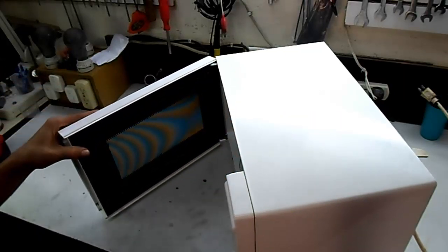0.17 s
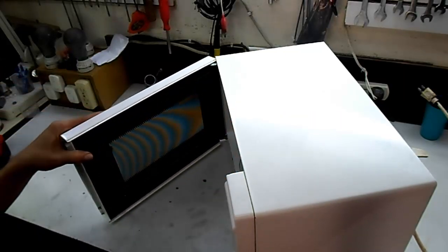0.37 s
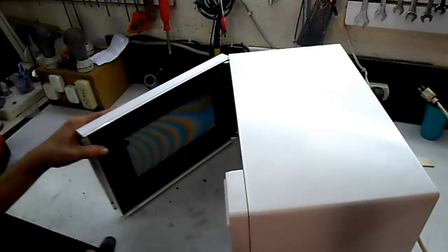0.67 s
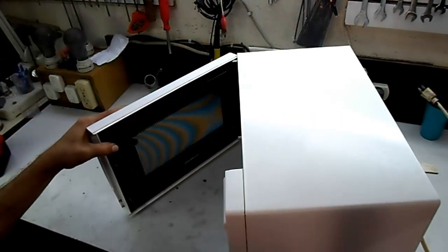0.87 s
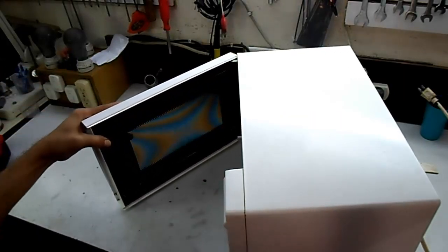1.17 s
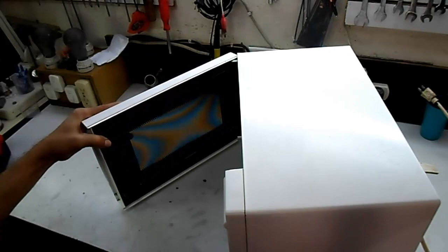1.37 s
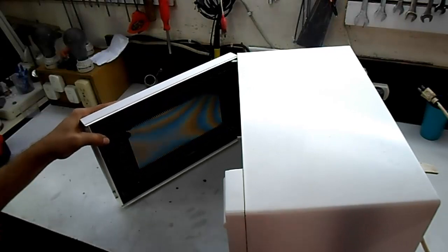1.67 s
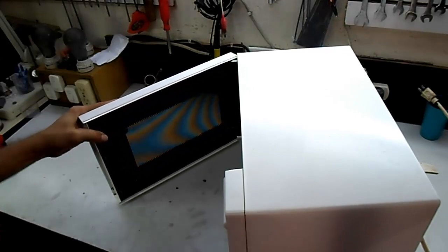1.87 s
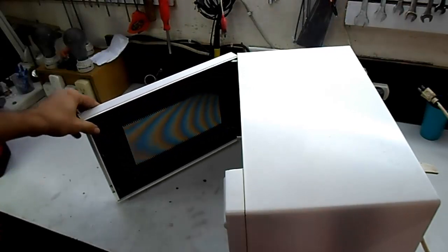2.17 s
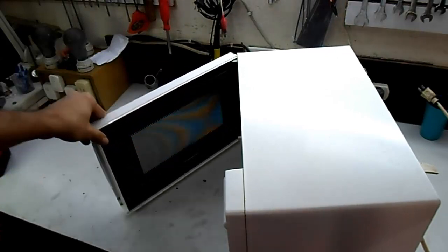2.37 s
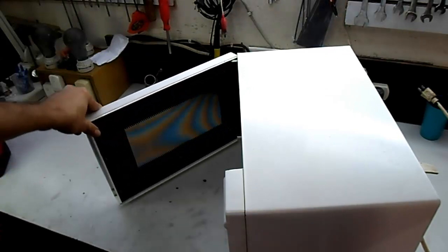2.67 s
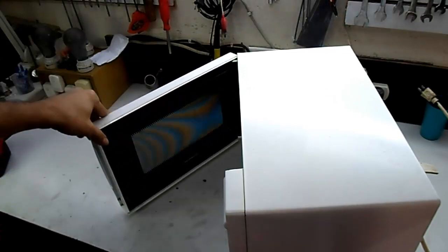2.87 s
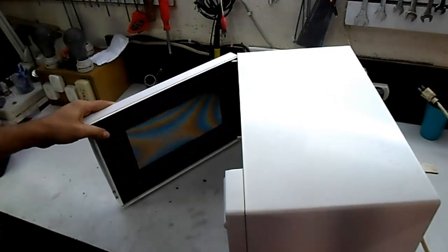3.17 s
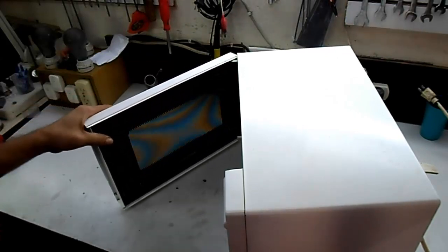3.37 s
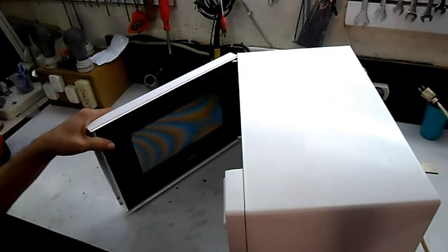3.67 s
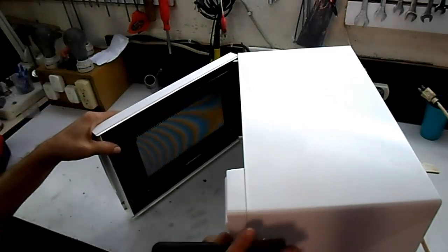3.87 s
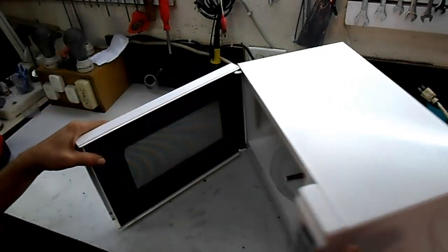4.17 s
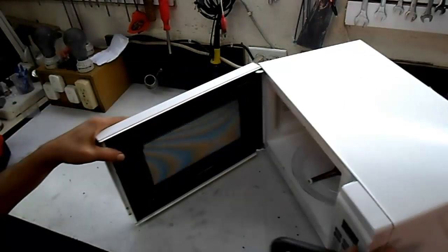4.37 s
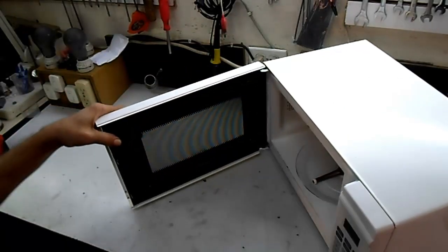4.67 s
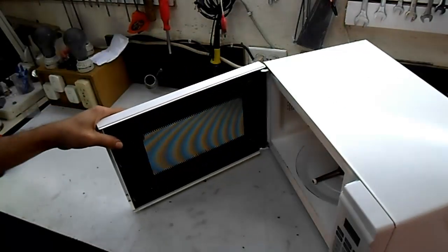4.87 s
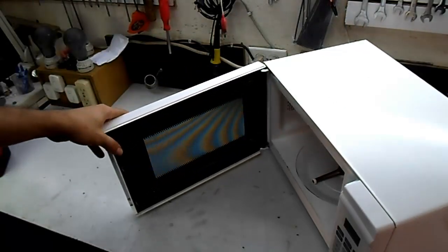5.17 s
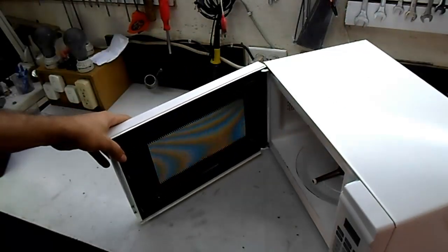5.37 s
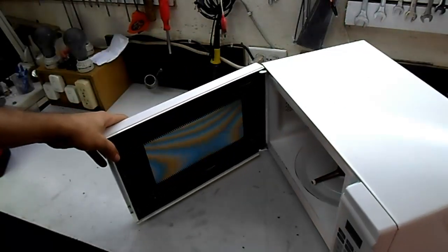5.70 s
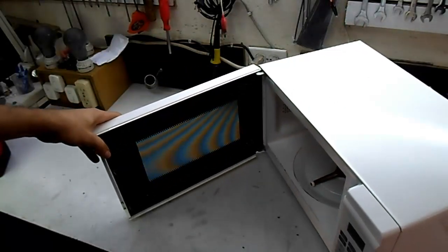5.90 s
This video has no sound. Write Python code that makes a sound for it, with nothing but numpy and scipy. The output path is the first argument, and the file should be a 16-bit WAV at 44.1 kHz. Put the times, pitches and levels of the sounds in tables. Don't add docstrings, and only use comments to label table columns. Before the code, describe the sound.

A hand works the loose door of a small metal oven on a workbench. It starts mid-rattle with hollow bangs and dragging, eases into creaks and ticks, then clunks hard twice more. Feet scrape and the case lands with low booming knocks near the end. Close, mono, rough small camera microphone, with faint workshop hum.

```python
import sys
import numpy as np
from scipy import signal
from scipy.fft import rfft, irfft, next_fast_len
from scipy.io import wavfile
from scipy.ndimage import uniform_filter1d

SR = 44100
rng = np.random.default_rng(int(sys.argv[2]) if len(sys.argv) > 2 else 0)


def log_audio(samples):
    frames = np.atleast_2d(samples).T
    limited = np.clip(frames, -1, 1)
    pcm = np.round(limited * 32767).astype(np.int16)
    wavfile.write(sys.argv[1], SR, pcm)


def decibels_to_gain(level_db):
    exponent = np.asarray(level_db, float) / 20
    return 10 ** exponent


N = 266187

# pitch_hz, level_db, t60_s
CASE_MODES = [(144.8, -8, .3), (161, -5.5, 0.8), (197, 0, 0.24), (212.7, -9, 0.59), (223.6, -1.5, 0.15)]
PANEL_MODES = [(243, -7, 0.067), (271.9, -9, 0.17), (287, -3.5, 0.17), (324, 0, 0.089), (347.6, -9, 0.2),
               (367.2, -1.5, 0.31), (406.4, -22.5, 0.45), (464.4, -8, 0.14), (490, -14, 0.3),
               (524, -3, 0.16), (558, -11, 0.2), (622, -3, 0.091), (644, -12, 0.2), (705, -9, 0.16),
               (800, -20, 0.17), (855, -14, 0.24)]
# pitch_hz, level_db, t60_s
PART_MODES = [(995, -2.5, 0.24), (1137, -7.5, 0.15), (1360, -1.5, 0.027), (1500, -8.5, 0.15),
              (1614, -8.5, 0.14), (1833, -5, 0.053), (2173, -6.5, 0.054), (2686, -19.5, 0.11)]
BENCH_MODES = [(52, -16, 0.14), (63.2, -8, 0.12), (79.2, 0, 0.24), (105, -11, 0.17), (120, -4.5, 0.22)]
# pitch_hz, level_db, t60_s
LATCH_MODES = [(851, -0.5, .12), (1450, -6.5, 0.075), (2250, -6, 0.1), (3510, -15, 0.03),
               (4750, -21, 0.093), (5400, -17, .08)]

# freq_hz, level_db (per Hz)
RATTLE_SPECTRUM = [(150, -24), (400, -1), (700, -0.5), (1300, -5), (1900, -7), (2600, -13), (4000, -25),
                   (8000, -35.5)]
GRIT_SPECTRUM = [(800, -29), (2000, 1), (3200, 1.5), (5000, -4), (7000, -5.5), (10000, -29.5)]
RUSTLE_SPECTRUM = [(300, -22), (1500, -1), (3000, 0.5), (5000, 0), (9000, 0)]
SHOP_SPECTRUM = [(10, -113), (22, -42), (45, -61.5), (62, -57.5), (120, -76), (250, -71.5), (500, -72.5),
                 (1000, -77.5), (2000, -84), (4000, -91), (8000, -97.5)]
MICROPHONE = [(4000, -1), (6500, 0.5), (8700, 7), (9500, 5), (10200, 0), (10600, -6.5), (10900, -14),
              (11020, -8)]

# start_s, blow_db, favoured_hz, narrowness_db_per_octave, judder_t60_s
DOOR_BLOWS = [(.013, -7, 362, 16, .097), (.315, -2, 314, 25, .087), (.646, -28, 285, 20, .083),
              (1.233, -6, 340, 26, .094), (1.854, -13, 288, 90, .11), (1.882, -9, 273, 56, .037),
              (2.284, -13, 286, 4, .074), (2.305, -7.5, 276, 21, .2), (2.332, -9, 282, 9, .17),
              (2.356, -4, 330, 28, .057), (2.632, -26, 326, 40, .09), (3.1678, 1, 281, 28, .092),
              (3.188, -1.5, 287, 21, .086), (3.222, -2.5, 334, 25, .11), (3.244, -10, 253, 43, .067),
              (4.712, -13, 370, 52, .072), (5.324, -15, 370, 48, .15)]
# start_s, blow_db, favoured_hz, narrowness_db_per_octave, judder_t60_s
CASE_BLOWS = [(.299, -9.5, 190, 27, .13), (.428, -17.5, 190, 18, .06), (.457, -13, 214, 18, .15),
              (.715, -18.5, 218, 40, .079), (.916, -9, 232, 12, .07), (.942, -8, 205, 42, .089),
              (1.276, -12.5, 220, 33, .26), (2.376, -9.5, 227, 22, .066), (3.527, -23, 226, 18, .11),
              (4.125, -17, 180, 17, .16), (4.69, -9, 198, 68, .091), (4.802, -3, 205, 34, .17),
              (4.846, -10.5, 198, 34, .08), (5.3, -5.5, 200, 50, .082), (5.314, 0, 197, 70, .19)]
# peak_s, rise_s (per 20 dB), fall_s (per 20 dB), case_db, panel_db
PUSHES = [(0., .05, .17, -13, -14), (.212, .2, .06, -22, -15), (.329, .05, .2, -12, -9),
          (.47, .08, .15, -30, -22), (.655, .025, .2, -32, -22), (.755, .15, .08, -23, -38),
          (.945, .04, .14, -32, -15), (1.236, .01, .28, -24, -19), (3.05, .12, .1, -55, -35),
          (1.876, .05, .08, -36, -23), (2.365, .09, .1, -19, -16), (2.654, .06, .05, -37, -28),
          (3.19, .03, .03, -22, -12), (3.222, .08, .14, -16, -15), (3.546, .08, .07, -30, -22.5),
          (4.06, .09, .05, -28, -45), (4.15, .02, .1, -20, -21), (4.29, .3, .18, -28, -23),
          (4.715, .08, .08, -22, -17), (4.59, .07, .08, -22, -26), (4.74, .1, .4, -15, -30),
          (4.85, .08, .12, -23, -14), (5.28, .1, .05, -25, -21), (5.35, .08, .07, -15, -12),
          (5.69, .1, .2, -32, -32)]
# peak_s, rise_s (per 20 dB), fall_s (per 20 dB), rattle_db, grit_db
SLIDES = [(.01, .1, .6, -24.5, -45), (.12, .12, .5, -28, -31.5), (.215, .3, .12, -23.5, -40),
          (.325, .02, .14, -21.5, -37), (.65, .02, .12, -33, -52), (.96, .08, .2, -34, -34),
          (1.06, .3, .3, -32, -46), (1.236, .01, .16, -29.5, -46), (1.507, .4, .06, -42.5, -48),
          (1.77, .2, .1, -46, -42), (1.87, .06, .13, -30, -40), (2.36, .17, .22, -28, -36),
          (2.722, .01, .14, -44, -42), (2.87, .015, .06, -50, -35.5), (3.168, .001, .2, -23, -42),
          (3.23, .05, .1, -27, -50), (3.07, .25, .3, -43, -52), (3.68, .06, .22, -34, -36),
          (3.55, .06, .15, -38, -46), (4.128, .003, .2, -26, -46), (4.28, .05, .25, -33, -48),
          (4.44, .5, .9, -31.5, -31), (4.84, .09, .12, -26, -30), (5.33, .12, .16, -31.5, -41),
          (6.03, .3, .1, -42, -48)]
# peak_s, level_db, pitch_hz, length_s
BOUNCES = [(0.0027, -10.1, 360, 0.0107), (0.0159, -8.7, 352, 0.0188), (0.0439, -8.2, 304, 0.0119),
           (0.0573, -14.5, 258, 0.0125), (0.0733, -14.8, 312, 0.0118), (0.0861, -12.3, 320, 0.0084),
           (0.1051, -15.8, 263, 0.0224), (0.1779, -15.5, 239, 0.0085), (0.1975, -14.3, 314, 0.0233),
           (0.2372, -13.8, 322, 0.0086), (0.3211, -2.0, 328, 0.0126), (0.3355, -1.4, 314, 0.0216),
           (0.3733, -6.3, 328, 0.0185), (0.4042, -10.0, 215, 0.0231), (0.4274, -14.0, 325, 0.0153),
           (0.4611, -13.3, 209, 0.0112), (0.9204, -9.0, 218, 0.019), (0.9452, -9.4, 220, 0.0174),
           (0.9671, -12.9, 218, 0.0166), (1.2441, -10.2, 339, 0.0169), (1.26, -14.2, 322, 0.0148),
           (1.2855, -13.6, 209, 0.0172), (1.8625, -14.6, 266, 0.0202), (1.8873, -11.3, 261, 0.0116),
           (2.2884, -13.9, 309, 0.0135), (2.312, -8.0, 282, 0.0083), (2.3449, -8.9, 306, 0.0313),
           (2.3642, -4.0, 352, 0.0165), (2.3787, -4.6, 277, 0.0118), (2.3992, -13.2, 199, 0.0168),
           (2.4151, -15.9, 193, 0.0275), (3.1717, -2.7, 296, 0.0089), (3.1952, 0.2, 271, 0.01),
           (3.2122, -6.0, 236, 0.0151), (3.2298, -4.2, 336, 0.0211), (3.2474, -5.5, 234, 0.0199),
           (3.2685, -14.2, 320, 0.0117), (3.2806, -12.0, 207, 0.0157), (3.3054, -16.7, 201, 0.0189),
           (4.1334, -18.5, 196, 0.0254), (4.7171, -8.9, 207, 0.0356), (4.7562, -15.6, 218, 0.0185),
           (4.7824, -13.7, 212, 0.0189), (4.8213, -5.3, 218, 0.0246), (4.8447, -9.7, 226, 0.0117),
           (4.8663, -11.6, 220, 0.0175), (5.3055, -9.5, 201, 0.0159), (5.3251, -5.8, 204, 0.0201),
           (5.3426, -7.3, 207, 0.023), (5.3646, -9.1, 201, 0.0372),
           (.468, -19, 315, .02),
    (.653, -21, 310, .013),
    (.723, -21, 213, .019),
    (1.328, -19, 240, .017),
    (1.388, -20, 229, .023),
    (4.18, -20, 215, .022),
    (4.698, -14, 205, .02),
    (4.806, -7, 205, .014),
    (4.92, -21, 205, .024),
]
# pitch_multiple, level_db
BOUNCE_TONES = [(1, -1.5), (.62, -19), (.82, -14), (1.19, -13), (1.65, -19), (2.1, -21)]
# peak_s, fall_s (per 20 dB), level_db
THUDS = [(.01, .2, -18), (.31, .4, -15), (.49, .15, -16), (.97, .1, -33), (1.36, .6, -29.5),
         (2.32, .22, -14), (2.86, .1, -28), (3.2, .45, -15), (4.14, .1, -18), (4.29, .15, -24),
         (4.58, .2, -25), (4.8, .1, -17), (4.97, .12, -16), (5.31, .3, -23), (5.67, .15, -25)]
# peak_s, level_db, pitch_hz, length_s
TAPS = [(0.014, -21.2, 1065, 0.0112), (0.0937, -23.3, 1429, 0.012), (0.1345, -23.9, 1197, 0.015),
        (0.1676, -24.0, 1399, 0.015), (0.1807, -23.3, 998, 0.015), (0.2068, -22.2, 1843, 0.015),
        (0.2377, -23.0, 1711, 0.0121), (0.3236, -17.5, 904, 0.0143), (0.3487, -18.3, 934, 0.015),
        (0.4305, -25.5, 855, 0.0112), (2.2865, -28.8, 1313, 0.0073), (2.3079, -28.4, 1324, 0.015),
        (2.3346, -27.3, 1041, 0.0046), (2.3472, -22.1, 904, 0.0071), (2.3586, -25.2, 1652, 0.015),
        (2.3796, -24.3, 925, 0.0098), (3.1699, -21.1, 866, 0.0076), (3.1937, -22.6, 1006, 0.015),
        (3.2297, -22.6, 947, 0.015), (4.1339, -14.8, 1480, 0.004), (4.1525, -19.3, 872, 0.015),
        (4.1657, -18.8, 1044, 0.0098), (4.181, -21.8, 882, 0.015), (4.1976, -26.0, 890, 0.0119),
        (4.452, -17.9, 1211, 0.0076), (4.4683, -22.0, 1235, 0.0055), (4.4817, -24.7, 1187, 0.015),
        (4.785, -28.0, 899, 0.0105), (4.797, -27.4, 1329, 0.0098), (4.8291, -23.3, 1294, 0.015),
        (4.8425, -25.1, 1491, 0.015), (4.8579, -27.0, 942, 0.0125), (4.8779, -25.6, 1733, 0.0115)]
# pitch_multiple, level_db
TAP_TONES = [(1, -6.5), (.6, -13), (.74, -12), (.87, -11), (1.13, -11), (1.29, -13), (1.46, -15),
             (1.68, -17), (1.93, -19), (2.4, -23), (3.1, -27)]
# peak_s, rise_s (per 20 dB), fall_s (per 20 dB), level_db
RUSTLES = [(.056, .17, .8, -38.5), (.25, .6, .05, -41), (.38, .15, .1, -43), (.6, .45, .3, -38.5),
           (.95, .17, .22, -39), (1.19, .4, .3, -49), (1.39, .6, .8, -47), (1.615, .3, .18, -41),
           (1.82, .5, .1, -46), (1.876, .1, .23, -42.5), (2.37, .5, .18, -43), (2.722, .02, .08, -53),
           (3.05, .1, .04, -51), (3.222, .07, .13, -42), (3.65, .6, .7, -49), (4.07, .35, .12, -43),
           (4.36, .5, .9, -39), (4.78, .3, .22, -40), (4.89, .5, .07, -43), (5.079, .03, .25, -48),
           (5.21, .3, .2, -51), (5.345, .05, .45, -48), (5.8, .004, .1, -42), (5.96, .03, .4, -50)]
# start_s, snap_db, knock_db, tail_t60_s
TICKS = [(0.3145, -34, -18, 0.12), (0.4284, -46.5, -36, 0.13), (0.635, -50, -28, 0.2),
         (0.7924, -36.5, -26.5, 0.17), (1.1428, -19, -24.5, 0.17), (2.05, -29, -38, 0.22),
         (2.153, -30.5, -51, 0.15), (2.263, -28, -32, 0.12), (2.7182, -35, -25.5, 0.38),
         (2.865, -35, -27, 0.25), (3.3376, -38, -30, 0.24), (3.6263, -31, -50, 0.12),
         (3.6534, -43, -33, 0.2), (3.6691, -23, -29, 0.13), (3.7477, -36, -29, 0.13),
         (3.9227, -32, -40, 0.15), (4.004, -46, -34.5, 0.19), (4.1272, -38, -20.5, 0.18),
         (4.445, -48, -33, 0.14), (4.781, -32, -27, 0.25), (4.9767, -46, -33, 0.084),
         (5.0783, -24.5, -34, 0.15), (5.1911, -38, -31, 0.16), (5.3353, -23, -39, 0.23),
         (5.7958, -28, -38, 0.12), (5.8272, -30, -45, 0.15), (5.8142, -31, -39, 0.2),
         (5.9437, -35, -50, 0.19)]
# start_s, t60_s, pitch_hz,
# width_hz, level_db
SQUEAKS = [
    (1.04, .3, 2250, 150, -35),
    (1.455, .35, 2350, 200, -41),
    (2.99, .12, 7200, 40, -49),
    (2.99, .13, 7800, 40, -47),
    (3.02, .12, 10400, 80, -50),
    (3.25, .52, 161, 14, -20.5),
    (3.655, .13, 2250, 150, -44),
    (3.745, .11, 2250, 80, -38),
    (4.23, 2.5, 5300, 350, -50),
]
# start_s, t60_s, pitch_hz, width_hz, level_db
RINGS = [
    (1.143, .26, 4740, 220, -43),
    (1.146, .14, 800, 120, -40),
    (2.72, .13, 4700, 250, -50),
    (2.72, .15, 1400, 120, -43),
    (4.128, .29, 1180, 250, -35),
    (4.128, .2, 1500, 300, -29),
    (4.128, .25, 2200, 400, -36),
    (4.128, .3, 813, 120, -36),
    (4.445, .25, 1290, 200, -36),
    (4.44, .27, 1660, 230, -35),
]
# peak_s, level_db, pitch_hz, length_s
PINGS = [
    (1.146, -29, 4780, .005),
    (1.146, -30, 9800, .003),
    (5.798, -37, 9200, .0035),
    (5.8155, -38, 9100, .0035),
    (5.829, -40, 8900, .003),
    (5.945, -39, 9100, .0035),
]


def unit(x):
    return x / np.sqrt(np.mean(x ** 2))


def colour(x, points):
    hz, db = np.transpose(points)
    size = next_fast_len(len(x))
    f = np.maximum(np.arange(size // 2 + 1) * SR / size, 1)
    gain = decibels_to_gain(np.interp(np.log(f), np.log(hz), db))
    return irfft(rfft(x, size) * gain, size)[:len(x)]


def ring(force, modes):
    out = 0
    for k, (hz, db, t60) in enumerate(modes):
        r = 1000. ** (-1 / (t60 * SR))
        w = 2 * np.pi * hz / SR
        mode = signal.lfilter([np.sin(w)], [1, -2 * r * np.cos(w), r * r], force)
        out = out + (-1) ** k * decibels_to_gain(db) * np.sqrt(1 - r * r) * mode
    return out


def walk(rate_hz):
    k = int(SR / rate_hz)
    steps = np.repeat(rng.standard_normal(N // k + 1), k)
    return 1.18 * uniform_filter1d(uniform_filter1d(steps, k), k)[:N]


def judder(rough_db):
    return unit(rng.standard_normal(N) * decibels_to_gain(rough_db * walk(90)))


def bursts(times, dbs, t60s, rise_s):
    out = np.zeros(N)
    for s, db, t60 in zip(times, dbs, t60s):
        i = int(s * SR)
        t = np.arange(min(N - i, int(1.2 * t60 * SR))) / SR
        out[i:i + len(t)] += decibels_to_gain(db - 60 * t / t60) * (1 - np.exp(-t / rise_s))
    return out


def swells(peak_s, rise_s, fall_s, peak_db, rest_db):
    late = np.arange(0, N + 64, 64)[:, None] / SR - peak_s
    each = peak_db - 20 * np.where(late < 0, -late / rise_s, late / fall_s)
    db = 10 * np.log10(np.sum(decibels_to_gain(2 * each), axis=1) + decibels_to_gain(2 * rest_db))
    return np.interp(np.arange(N) / 64, np.arange(len(db)), db)


def contacts(table, tones, sag):
    out = np.zeros(N)
    phases = rng.random((len(table), len(tones)))
    for (s, db, hz, length), phase in zip(table, phases):
        rise = length / 2.4
        i = int((s - rise) * SR)
        t = np.arange(int(9 * rise * SR)) / SR
        cycles = hz * t * (1 - sag * t / length)
        tone = sum(decibels_to_gain(g) * np.sin(2 * np.pi * (k * cycles + p)) for (k, g), p in zip(tones, phase))
        contact = decibels_to_gain(db) * t / rise * np.exp(1 - t / rise) * tone
        out[max(i, 0):i + len(t)] += contact[max(-i, 0):]
    return out


def shop():
    return np.sqrt(SR / 2) * colour(rng.standard_normal(N), SHOP_SPECTRUM) * decibels_to_gain(.6 * walk(3))


def shell(modes, drag_db, drag_hz):
    s, blow, favoured_hz, narrowness, t60 = np.transpose(DOOR_BLOWS + CASE_BLOWS)
    force, out = judder(0.76), 0
    for hz, db, ring_t60 in modes:
        reach = blow - np.minimum(narrowness * np.abs(np.log2(hz / favoured_hz)), 18.)
        drag = drag_db - np.minimum(35.0 * np.abs(np.log2(hz / drag_hz)), 14.)
        kick = bursts(s, reach - 4., np.full(len(s), .004), 0.00018)
        chatter = bursts(s, reach - 12., t60, 0.0091)
        push = force * (decibels_to_gain(drag) + chatter) + rng.choice([-1, 1]) * kick
        out = out + ring(push, [(hz, db, ring_t60)])
    return out


def loose_parts(rattle_db):
    s, blow, _, narrowness, t60 = np.transpose(DOOR_BLOWS + CASE_BLOWS)
    blow_rattle = blow - 18 - .35 * narrowness
    shaking = decibels_to_gain(rattle_db - 2.3) + bursts(s, blow_rattle - 8., t60, .0008)
    rough = unit(colour(judder(1.1), RATTLE_SPECTRUM)) * shaking
    return rough + ring(judder(1.8) * shaking, PART_MODES) * decibels_to_gain(-9.5)


def oven():
    *push, case_db, panel_db = np.transpose(PUSHES)
    *slide, rattle_db, _ = np.transpose(SLIDES)
    case = shell(CASE_MODES, swells(*push, case_db, rest_db=-47) - 1.5, drag_hz=197.)
    panel = shell(PANEL_MODES, swells(*push, panel_db, rest_db=-49) - 3.5, drag_hz=300)
    return case + panel + loose_parts(swells(*slide, rattle_db, rest_db=-57))


def stop_bounces():
    return contacts(BOUNCES, BOUNCE_TONES, sag=.004)


def bench():
    s, fall_s, thud_db = np.transpose(THUDS)
    level_db = swells(s, .07, fall_s, thud_db, rest_db=-39)
    return ring(judder(1.) * decibels_to_gain(level_db - 1.5), BENCH_MODES)


def scrape():
    *slide, _, grit_db = np.transpose(SLIDES)
    level_db = swells(*slide, grit_db, rest_db=-53)
    return unit(colour(judder(1.8), GRIT_SPECTRUM)) * decibels_to_gain(level_db - 5.0)


def part_taps():
    return contacts(TAPS, TAP_TONES, sag=.004)


def rustle():
    level_db = swells(*np.transpose(RUSTLES), rest_db=-60)
    return unit(colour(judder(0.53), RUSTLE_SPECTRUM)) * decibels_to_gain(level_db + 4.24)


def latch():
    s, snap, knock, t60 = np.transpose(TICKS)
    crack_t60 = np.full(len(s), .016)
    crack = unit(colour(judder(.8), RUSTLE_SPECTRUM)) * bursts(s, snap + 0.64, crack_t60, 0.00014)
    bright = unit(colour(rng.standard_normal(N), [(2500, -10), (6000, -11), (8700, -1)]))
    hiss = bright * bursts(s, snap - 12., t60, 0.0045)
    dull = bursts(s, knock - 3., crack_t60, 0.00034) + bursts(s, knock - 6., t60, 0.0027)
    hooks = ring(rng.standard_normal(N) * dull, LATCH_MODES) * decibels_to_gain(-2.5)
    frame = unit(colour(judder(0.5), RATTLE_SPECTRUM)) * dull
    return crack + hiss + frame + hooks


def squeaks():
    out, noise = np.zeros(N), rng.standard_normal(N)
    for table, rise_s in ((SQUEAKS, .022), (RINGS, .002)):
        for s, t60, hz, width, db in table:
            width_t60 = np.log(1000) / np.pi / width
            band = ring(noise, [(hz, db + 10.5, width_t60)])
            out += band * bursts([s], [0], [t60], rise_s)
    return out


def spring_pings():
    return contacts(PINGS, [(1, 0)], sag=.015)


def scene():
    metal = oven() + stop_bounces() + part_taps() + latch() + squeaks() + spring_pings()
    return (shop() + metal + bench() + scrape() + rustle())[None]


def top_cut(x):
    return signal.sosfilt(signal.butter(12, 16530, fs=SR, output="sos"), x)


def record(dry):
    end_s, top_hz = 6.034, 15700
    half = colour(dry[0], MICROPHONE + [(SR / 4, -80)])[::2]
    rounded = np.clip(half / (1 + (np.abs(half) / 1.1) ** 4) ** (1 / 4), -1, 1)
    held = np.repeat(rounded, 2)[:N] * (np.arange(N) < end_s * SR)
    cut = colour(held, [(top_hz, 0), (top_hz + 150, -25), (top_hz + 800, -45)])
    return top_cut(cut[None])


dry = scene()
out = record(dry)
log_audio(out)
```